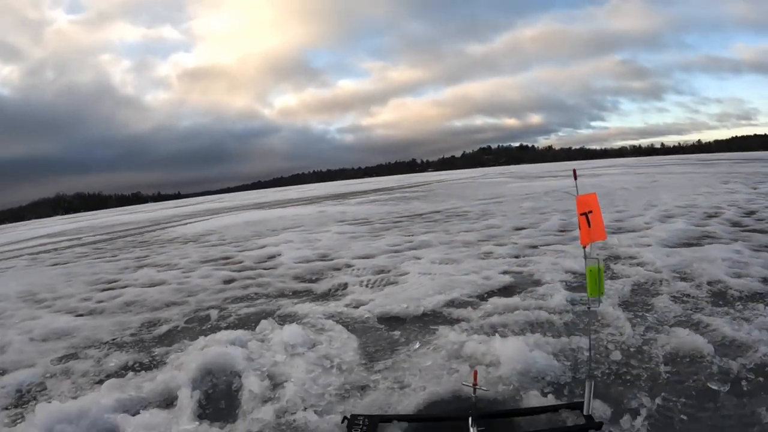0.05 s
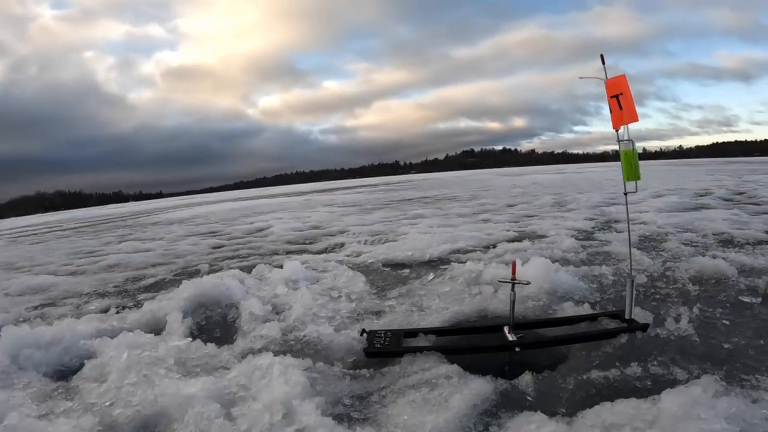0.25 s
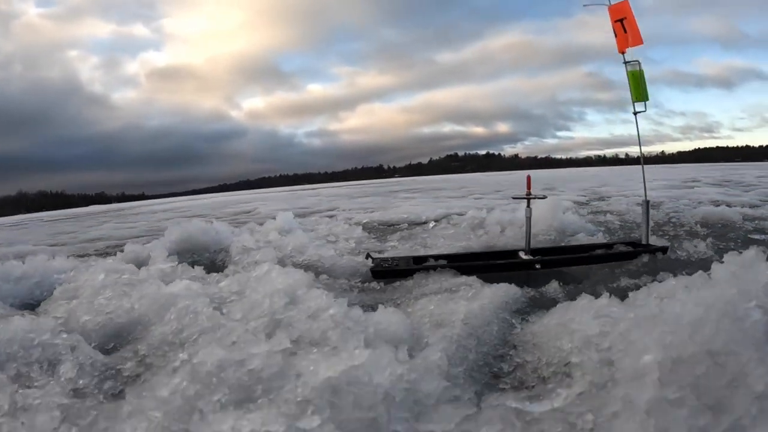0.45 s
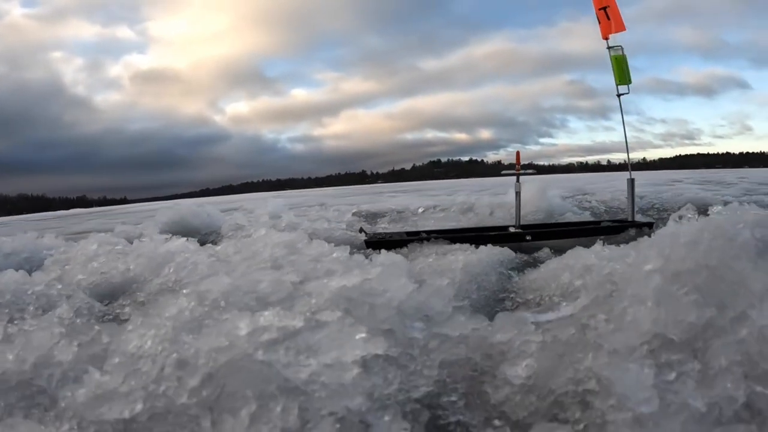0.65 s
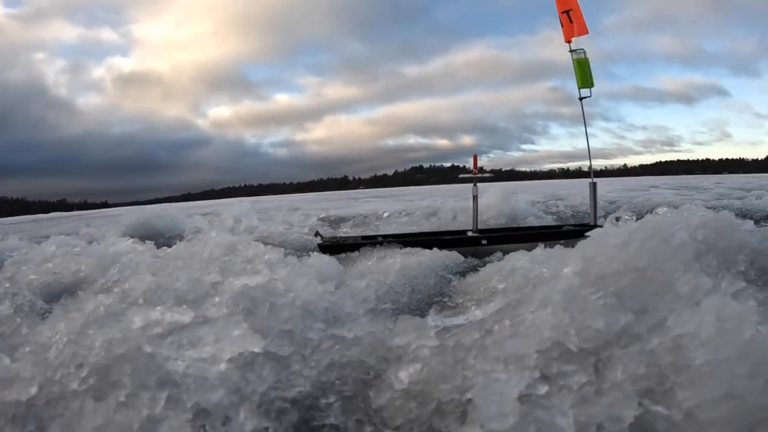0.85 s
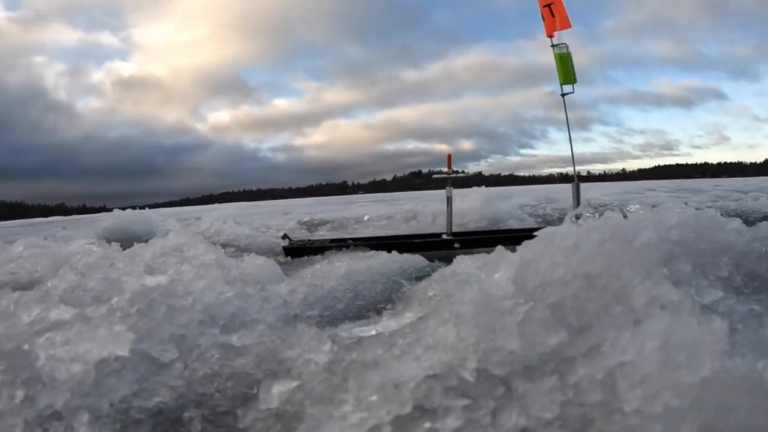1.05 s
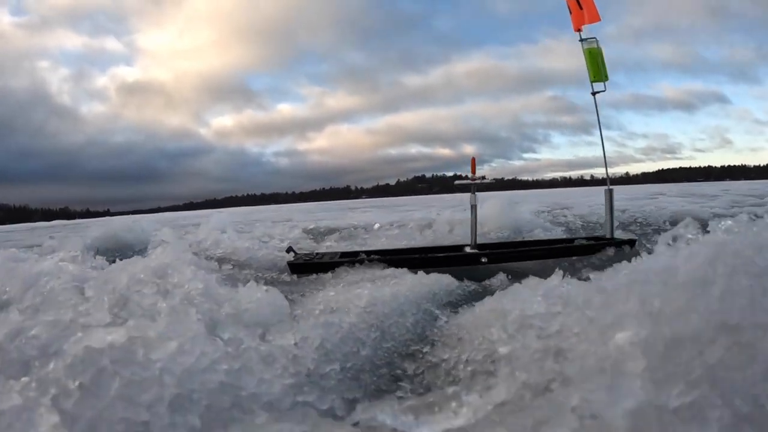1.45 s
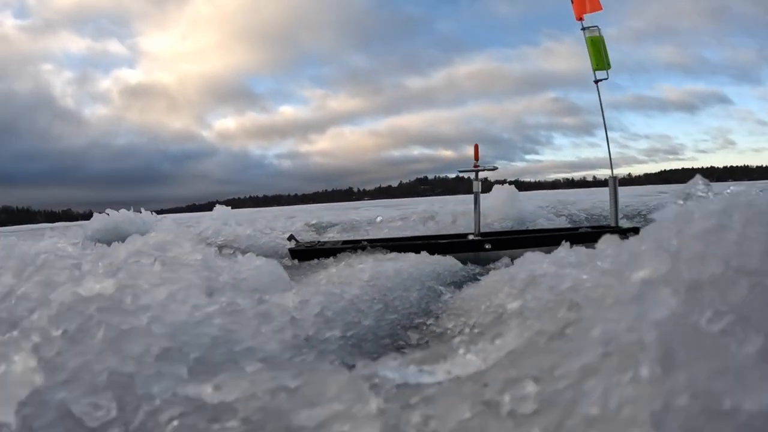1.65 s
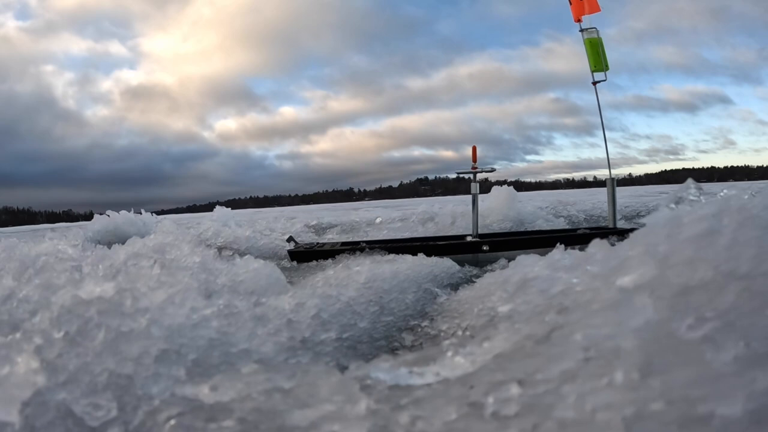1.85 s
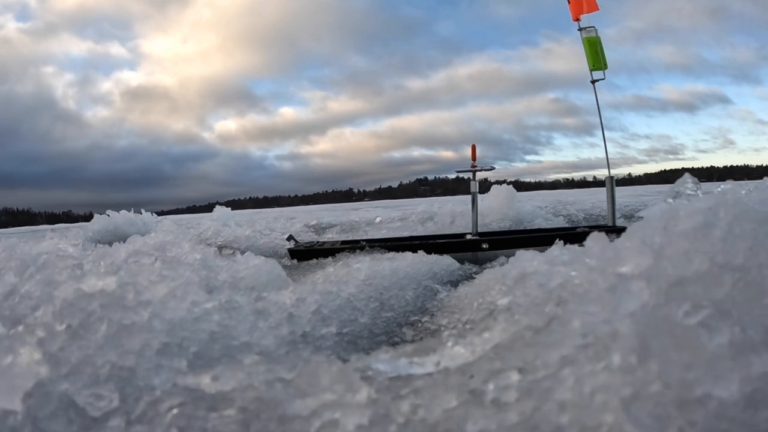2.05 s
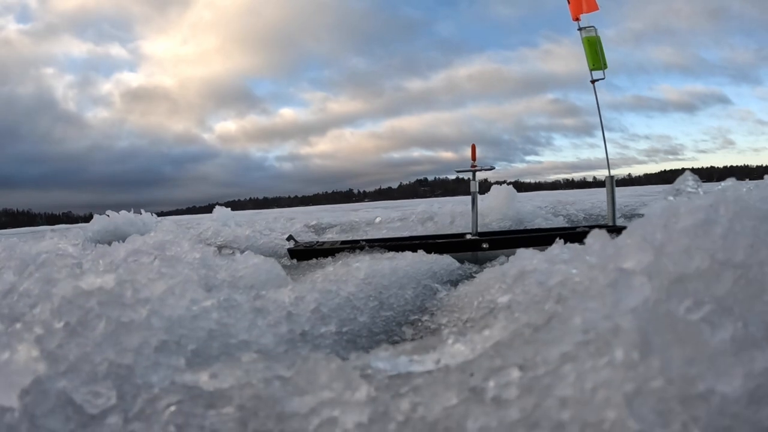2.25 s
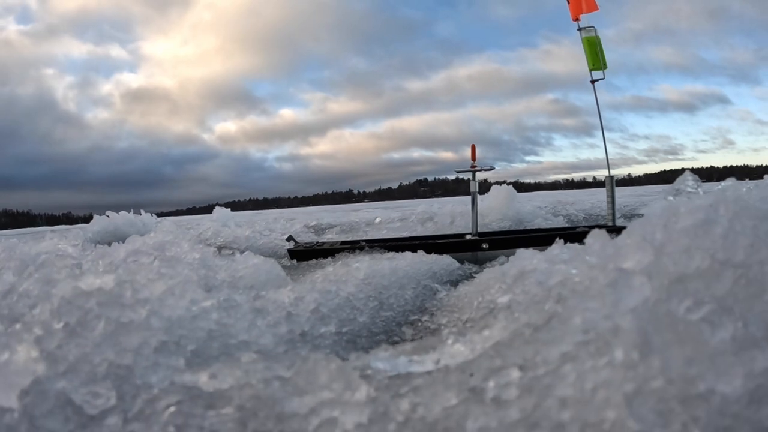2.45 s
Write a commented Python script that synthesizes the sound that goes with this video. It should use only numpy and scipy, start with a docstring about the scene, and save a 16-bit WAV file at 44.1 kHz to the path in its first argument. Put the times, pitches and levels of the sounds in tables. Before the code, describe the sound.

Ice crust crunches and snaps under a hand-held camera outdoors, heard through its own microphone. Brief squeaky handling leads to a thudding landing and a run of crunches, then two shorter bursts, with faint low wind and handling rumble beneath.

```python
"""Camera set down on lake ice

Out on a crusty frozen lake, heard at no distance through a hand-held camera's own microphone. The mount
rubs on the way down, lands with a short squeaky skid and is pushed into the crust several times: grains
crush, the ice groans, crystals snap, and each snap thuds through the mount and clicks through the case.
Crumbs crackle, the mount rocks, and handling and light wind rumble underneath."""
import sys
import numpy as np
from scipy import signal
from scipy.fft import rfft, irfft, next_fast_len
from scipy.io import wavfile
from scipy.ndimage import uniform_filter1d

SR = 44100
rng = np.random.default_rng(int(sys.argv[2]) if len(sys.argv) > 2 else 0)


def pcm_store(signal):
    """Save signal as 16-bit PCM."""
    levels = np.round(np.clip(np.atleast_2d(signal), -1, 1) * 32767)
    wavfile.write(sys.argv[1], SR, levels.astype(np.int16).T)


N = 114660

# Pushes into the crust. Each row: peak time, rise and fall in seconds, then grit, crush and thud in dB.
CRUST_PUSHES = [(0.645, 0.011, 0.032, -28.5, -22, -7), (0.701, 0.02, 0.071, -43.5, -29.5, -26),
                (0.81, 0.027, 0.065, -29.5, -28, -13.5), (0.831, 0.024, 0.018, -31, -20.5, -14),
                (0.865, 0.0083, 0.024, -37, -24, -19), (0.887, 0.023, 0.028, -36.5, -21.5, -15),
                (0.937, 0.044, 0.071, -46, -68, -34), (1.031, 0.04, 0.04, -41, -26.5, -20.5),
                (1.064, 0.023, 0.02, -28, -21.5, -13), (1.601, 0.025, 0.0084, -30.5, -19, -16.5),
                (1.674, 0.042, 0.07, -50.5, -39, -28.5), (1.762, 0.028, 0.044, -49, -64, -27.5),
                (2.064, 0.036, 0.026, -48.5, -42, -22), (2.102, 0.017, 0.049, -41, -35.5, -18.5),
                (2.224, 0.033, 0.11, -56, -50, -28), (2.264, 0.025, 0.037, -56.5, -45.5, -25.5)]
# Crystals breaking right under the camera.
# Each row: start in seconds, snap strength in dB, ring in Hz, thud level in dB, thud pitch in Hz.
CRYSTAL_SNAPS = [(.6525, -21, 3300, -5, 219), (0.6942, -11.5, 2096, -7.5, 220),
                 (0.7146, -15.5, 2120, -12, 236), (.8059, -12, 1440, -23, 275), (.818, -12, 2070, -9, 279),
                 (.8276, -9, 2310, -11, 323), (0.8356, -18, 1820, -14, 268.6),
                 (0.8598, -17.5, 2400, -46, 230), (.884, -16.5, 1940, -11, 350),
                 (1.007, -23, 590, -5.5, 151), (1.032, -25, 1360, -9, 326),
                 (1.064, -14.5, 2650, -6.5, 186.4), (1.5944, -26, 970, -10, 260),
                 (1.6017, -18, 2400, -2.5, 208), (1.6367, -29, 3180, -27, 200),
                 (1.662, -22, 2020, -23.5, 176), (1.7108, -34.5, 2940, -18, 206),
                 (1.7138, -24.5, 1000, -26.5, 220), (1.762, -26.5, 2650, -22, 136),
                 (1.818, -49, 2110, -17.5, 163), (1.957, -43, 2600, -20, 130),
                 (2.01, -32, 1050, -20.5, 152), (2.0637, -22, 2350, -6.5, 135),
                 (2.0992, -19, 2200, -5, 165), (2.126, -28.5, 2180, -16.5, 129),
                 (2.222, -29, 1380, -16.5, 158), (2.2611, -25, 2190, -9.5, 116)]
# The crust packing down. Each row: peak time, rise and fall in seconds, pitch in Hz, level in dB.
CRUST_GROANS = [(0.899, 0.052, 0.028, 335, -21.5), (1.052, 0.053, 0.015, 420, -27),
                (1.594, 0.019, 0.022, 330, -11.5)]
# Strokes on the mount. Each row: start and length in seconds, then rasp, hiss and body in dB.
RUB_STROKES = [(.0, 0.52, -46.5, -49, -44), (0.032, 0.028, -31.5, -42.5, -40),
               (0.178, 0.062, -38, -42.5, -34), (0.253, 0.032, -27.5, -33.5, -27),
               (0.347, 0.0066, -38, -36, -28), (0.372, 0.014, -24.5, -35, -26.5),
               (0.424, 0.015, -25.5, -36, -29), (0.481, 0.023, -43.5, -49.5, -44.5),
               (.548, 0.014, -29.5, -38.5, -33), (0.571, 0.015, -37, -42.5, -38),
               (0.788, 0.047, -32, -43, -46)]
# Short pitched ticks: slips of the grip, and one late crystal snap's ring.
# Each row: start in seconds, level in dB, pitch in Hz.
PITCHED_TICKS = [(0.0359, -14, 1054), (.114, -20, 1200), (.353, -5.5, 740), (0.3704, -14, 600),
                 (.376, -11, 836), (.44, -14, 860), (0.556, -15.5, 1310), (0.564, -15, 1530),
                 (1.76, -24, 1370)]
# High ringing that lingers after two hard blows.
# Each row: start in seconds, pitch in Hz, level in dB, seconds to fall 60 dB.
HIGH_RINGS = [(0.647, 2080, -36, 0.37), (1.601, 3090, -41, 0.24)]
# The mount rocking. Each row: peak time in seconds, level in dB, frequency in Hz.
MOUNT_BUMPS = [(0.642, -12, 50), (.729, -12.5, 47), (1.086, -17, 54.6), (1.274, -19, 25.2),
               (1.629, -14.5, 62.2), (2.079, -12, 82.4), (2.146, -15.5, 55), (2.233, -16, 46.8),
               (2.309, -20.5, 46)]
# The grip creeping while the camera rests. Each row: start and length in seconds, level in dB.
GRIP_CREEPS = [(1.11, 0.067, -61), (1.81, 0.2, -70)]
# Rise and fall of wind and handling at the microphone. Each row: time in seconds, relative level in dB.
RUMBLE_CONTOUR = [(0.0, -38.5), (0.708, -33.5), (2.33, -28.5), (2.6, -38)]

# Resonances of the case and the mount. Each row: centre in Hz, width in Hz, strength in dB.
CASE_MODES = [(1380, 140, -0.5), (2086, 100, -1.5), (3130, 200, 2), (4390, 84, -11), (7200, 80, -5)]
MOUNT_MODES = [(824, 37, -2), (1270, 180, -4.5)]

# The colour of each sound at the microphone. Each row: frequency in Hz, relative level in dB.
GRIT_COLOUR = [(400, -12.5), (1400, 0.5), (2400, 2.5), (3600, -5.5), (5000, -10), (7000, -19), (9000, -31),
               (15000, -56)]
CRUSH_COLOUR = [(120, -15.5), (380, 0), (600, -4), (1000, -14), (1700, -29), (4000, -51), (9000, -61)]
THUD_COLOUR = [(25, -9.5), (65, 3), (120, 0), (200, -2.5), (330, -11), (550, -28), (1200, -42.5),
               (4000, -84)]
SNAP_COLOUR = [(100, -4.5), (500, 13), (1200, 2), (2500, 1.5), (4000, -15.5), (6500, -28.5), (9000, -42),
               (15000, -54)]
SKID_COLOUR = [(500, -10.5), (1300, -3.5), (2000, -1), (3300, -0.5), (4500, -15), (7000, -21.5),
               (10000, -37), (12300, -41), (13500, -31.5), (16000, -34.5)]
CRUMB_COLOUR = [(2000, -7), (5500, 2), (11000, -16.5), (14000, -27)]
RASP_COLOUR = [(150, -22), (400, 2), (850, 2.5), (1300, -1.5), (2000, -20), (4000, -31.5), (9000, -52.5)]
HISS_COLOUR = [(600, -22.5), (1800, 3.5), (3200, 0), (4200, -4.5), (5200, -5), (7300, -17), (8800, -29.5),
               (14000, -28.5), (16000, -31.5)]
BODY_COLOUR = [(60, -22.5), (180, 0.5), (330, -5.5), (600, -22.5), (1500, -26), (5000, -75)]
CREEP_COLOUR = [(600, -8.5), (1500, -1), (2150, -4.5), (3000, -5), (5000, -18), (9000, -34)]
RUMBLE_COLOUR = [(6, -22.5), (28, 7), (60, -5), (110, -11.5), (180, -23.5), (300, -41.5), (700, -63.5),
                 (3000, -100)]
AIR_COLOUR = [(100, 3), (600, -2), (1000, -12.5), (1450, -16.5), (2600, -25.5), (6000, -39), (16000, -54)]


def crust_crunch():
    """Each push breaks a cloud of grains: bright grit, duller crushing and thudding in the mount."""
    swells = np.array([swell(peak, 0, rise, fall) for peak, rise, fall, *_ in CRUST_PUSHES])
    grit_db, crush_db, thud_db = np.transpose(CRUST_PUSHES)[3:]
    grit = effort(swells, grit_db) * grains(per_s=940, spread_db=9.5, smooth=1.0)
    crush = effort(swells, crush_db) * grains(per_s=650, spread_db=4.0, smooth=0.35)
    thud = effort(swells, thud_db) * grains(per_s=500, spread_db=2.0, smooth=0.51)
    return (through(grit, response(GRIT_COLOUR, CASE_MODES))
            + through(crush, response(CRUSH_COLOUR))
            + through(thud, response(THUD_COLOUR)))


def crystal_snaps(splinter_t60_s=0.012, ring_t60_s=0.011):
    """A crystal gives way in a burst of splinters and rings briefly; the mount drops and thuds."""
    splinters, rings = np.zeros((2, N))
    t = np.arange(SR // 20) / SR
    for start, snap_db, ring_hz, thud_db, thud_hz in CRYSTAL_SNAPS:
        burst = rng.standard_normal(len(t)) * amp(-60 * t / splinter_t60_s)
        add(splinters, start, amp(snap_db + 3) * burst / np.linalg.norm(burst))
        for hz, share in (ring_hz, 1), (ring_hz * 1.65, 0.5):
            add(rings, start, share * amp(snap_db - 5.5) * ring(hz, ring_t60_s, ring_t60_s / 20))
        add(rings, start, -amp(thud_db) * ring(thud_hz, t60_s=0.044, attack_s=0.00098))
    case = response(SNAP_COLOUR, CASE_MODES)
    return through(splinters, case / np.abs(case).max()) + rings


def landing_skid(start_s=0.644, slip_hz=1796, jitter=0.2, count=40):
    """The case touches down and slides a hair's breadth: a very short squeak of uneven slips."""
    gaps = np.exp(jitter * rng.standard_normal(count)) / slip_hz
    sizes = amp(2 * rng.standard_normal(count))
    slips = np.zeros(N)
    for delay, size in zip(np.cumsum(gaps) - gaps[0], sizes):
        add(slips, start_s + delay, np.array([size]))
    slips *= swell(start_s, hold_s=0.0058, rise_s=0.0015, fall_s=0.0042)
    return amp(-15) * np.sqrt(SR / slip_hz) * through(slips, response(SKID_COLOUR, CASE_MODES))


def crust_groans(waver_share=0.04, tilt_db_per_octave=-12.5):
    """Ice packing under the mount sticks and slips at a low, wavering pitch."""
    out = np.zeros(N)
    for peak, rise, fall, hz, db in CRUST_GROANS:
        waver = unit(uniform_filter1d(rng.standard_normal(N), size=300))
        phase = 2 * np.pi * np.cumsum(hz * (1 + waver_share * waver)) / SR
        tone = sum(amp(tilt_db_per_octave * np.log2(k)) * np.sin(k * phase) for k in range(1, 5))
        out += amp(db) * swell(peak, 0, rise, fall) * tone
    return out


def crumbs(db_per_snap_db=0.54):
    """Fine crumbs crackle around each snap, louder around the stronger ones."""
    showers = [amp(db_per_snap_db * db) * swell(start, 0, rise_s=0.01, fall_s=0.036)
               for start, db, *_ in CRYSTAL_SNAPS]
    crackle = np.max(showers, axis=0) * grains(per_s=7400, spread_db=5.5, smooth=0)
    return amp(-45.5) * through(crackle, response(CRUMB_COLOUR))


def mount_rub():
    """Stick-slip friction on the mount: a rasp, a fine hiss, a low body and squeaks."""
    swells = np.array([swell(start, length, rise_s=0.00624, fall_s=0.028)
                       for start, length, *_ in RUB_STROKES])
    rasp_db, hiss_db, body_db = np.transpose(RUB_STROKES)[2:]
    rasp = effort(swells, rasp_db) * grains(per_s=500, spread_db=3.5, smooth=0.066)
    hiss = effort(swells, hiss_db) * grains(per_s=700, spread_db=4, smooth=0.45)
    body = effort(swells, body_db) * grains(per_s=650, spread_db=1.5, smooth=0.22)
    out = through(rasp, response(RASP_COLOUR, MOUNT_MODES))
    out += through(hiss, response(HISS_COLOUR))
    out += through(body, response(BODY_COLOUR))
    return out + squeaks(effort(swells, rasp_db))


def squeaks(strength, typical_hz=1130, log_spread=0.45, count=500):
    """Tiny slips at random moments, each ringing at its own pitch; the high ones are weaker."""
    out = np.zeros(N)
    for sample, (pitch, size) in zip(rng.integers(N, size=count), rng.standard_normal((count, 2))):
        hz = min(typical_hz * np.exp(log_spread * pitch), SR / 10)
        gain = strength[sample] * amp(3.5 + 2 * size) * min(1, typical_hz / hz)
        add(out, sample / SR, gain * ring(hz, t60_s=0.026, attack_s=0.00065))
    return out


def pitched_ticks():
    """Each tick is one quickly damped vibration."""
    out = np.zeros(N)
    for start, db, hz in PITCHED_TICKS:
        add(out, start, amp(db) * ring(hz, t60_s=0.013, attack_s=0.00052))
    return out


def high_ringing(half_width_hz=140):
    """A fuzzy, narrow band of high ringing lingers after two hard blows."""
    out = np.zeros(N)
    f = np.fft.rfftfreq(N, 1 / SR)
    for start, hz, db, t60 in HIGH_RINGS:
        band = irfft(rfft(rng.standard_normal(N)) / (1 + ((f - hz) / half_width_hz) ** 4), N)
        out += amp(db) * unit(band) * swell(start, 0, rise_s=0.002, fall_s=t60 / 3)
    return out


def mount_bumps(width_cycles=0.79):
    """The mount rocks and settles: each soft, low bump is one slow swing, with no ring."""
    out = np.zeros(N)
    for peak, db, hz in MOUNT_BUMPS:
        cycles = (np.arange(N) / SR - peak) * hz
        out -= amp(db) * np.cos(2 * np.pi * cycles) * np.exp(-(cycles / width_cycles) ** 2)
    return out


def grip_creep():
    """The grip creeps faintly on the mount between pushes."""
    swells = np.array([swell(start, length, rise_s=0.04, fall_s=0.12)
                       for start, length, _ in GRIP_CREEPS])
    strength = effort(swells, np.transpose(GRIP_CREEPS)[2])
    return through(strength * grains(per_s=700, spread_db=12, smooth=0.99), response(CREEP_COLOUR))


def wind_and_handling():
    """Hands and light wind rumble on the camera, over the faint open air of the lake."""
    contour_db = np.interp(np.arange(N) / SR, *np.transpose(RUMBLE_CONTOUR))
    rumble = unit(through(rng.standard_normal(N), response(RUMBLE_COLOUR)))
    air = unit(through(rng.standard_normal(N), response(AIR_COLOUR)))
    return amp(contour_db + 1) * rumble + amp(-62) * air


def amp(db):
    """Decibels to gain."""
    return 10 ** (np.asarray(db) / 20)


def unit(x):
    """Scale to rms 1."""
    return x / np.sqrt(np.mean(x ** 2) + 1e-20)


def add(track, start_s, sound):
    """Mix a sound in at a time."""
    part = track[max(0, round(start_s * SR)):][:len(sound)]
    part += sound[:len(part)]


def response(colour, modes=(), size=8192):
    """Causal impulse response of energy 1: a colour with resonances standing on it."""
    f = np.fft.rfftfreq(size, 1 / SR)
    hz, db = np.transpose(colour)
    gain = amp(np.interp(np.log(f + 1), np.log(hz), db))
    for centre, width, level in modes:
        gain *= np.sqrt(1 + 2 * amp(level) ** 2 / (1 + (2 * (f - centre) / width) ** 2))
    cepstrum = irfft(np.log(gain))
    fold = np.r_[1, np.full(size // 2 - 1, 2), np.zeros(size // 2)]  # gives minimum phase
    impulse = irfft(np.exp(rfft(cepstrum * fold)))
    return impulse / np.linalg.norm(impulse)


def through(x, impulse):
    """Play x through an impulse response."""
    return signal.fftconvolve(x, impulse)[:N]


def grains(per_s, spread_db, smooth):
    """Random impulses of uneven size over a share of smooth friction; steady power near 1."""
    hits = rng.random(N) < per_s / SR
    signs = np.sign(rng.standard_normal(N))
    sizes = amp(spread_db * rng.standard_normal(N))
    texture = unit(hits * signs * sizes) + smooth * rng.standard_normal(N)
    local_power = np.abs(uniform_filter1d(texture ** 2, size=1100))
    return texture / np.sqrt(local_power + 1e-9)


def swell(peak_s, hold_s, rise_s, fall_s):
    """Rise, hold and fall, straight in dB; the rise and fall times each span 20 dB."""
    t = np.arange(N) / SR - peak_s
    return amp(-20 * (np.maximum(-t, 0) / rise_s + np.maximum(t - hold_s, 0) / fall_s))


def effort(swells, levels_db):
    """Power sum of swells, each at its level."""
    return np.sqrt(amp(levels_db) ** 2 @ swells ** 2)


def ring(hz, t60_s, attack_s):
    """One damped vibration."""
    t = np.arange(SR // 6) / SR
    return np.sin(2 * np.pi * hz * t) * amp(-60 * t / t60_s) * (1 - np.exp(-t / attack_s))


def scene():
    """Everything is right at the one microphone, with no room."""
    ice = landing_skid() + crust_crunch() + crust_groans() + crystal_snaps() + crumbs()
    small_sounds = mount_rub() + pitched_ticks() + high_ringing() + grip_creep() + mount_bumps()
    return (ice + small_sounds + wind_and_handling())[None]


def record(dry):
    """The camera cuts off steeply at its band limit."""
    top_hz = 15750
    size = next_fast_len(N + SR // 2)
    low_pass = 1 / (1 + (np.fft.rfftfreq(size, 1 / SR) / top_hz) ** 120)
    return irfft(rfft(dry, size) * low_pass, size)[:, :N]


dry = scene()
out = record(dry)
pcm_store(out)
```